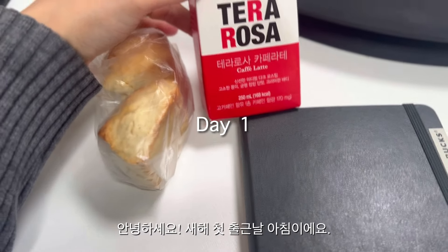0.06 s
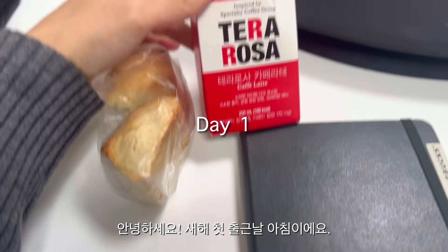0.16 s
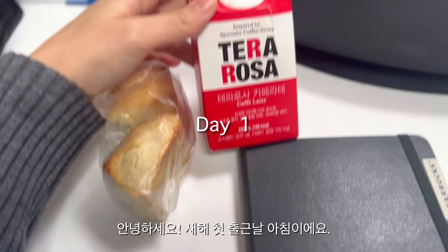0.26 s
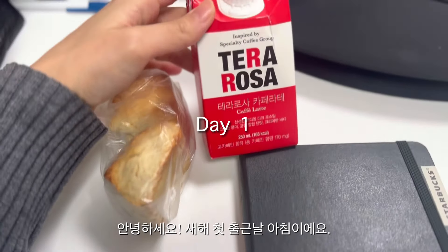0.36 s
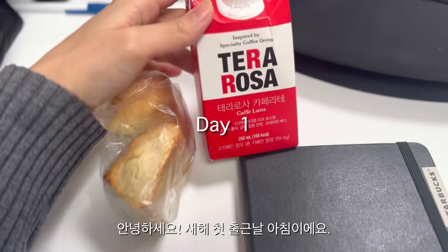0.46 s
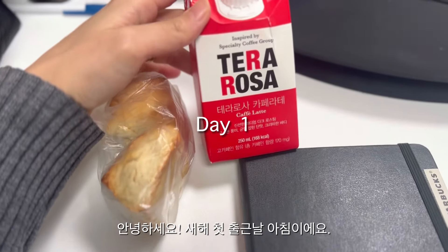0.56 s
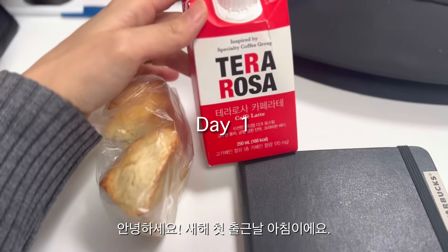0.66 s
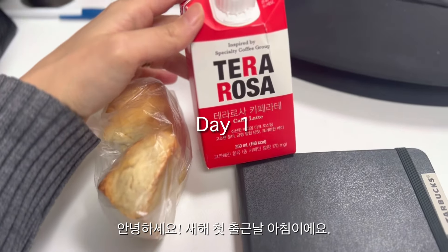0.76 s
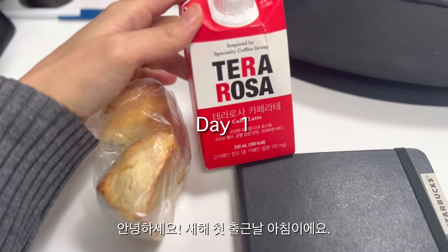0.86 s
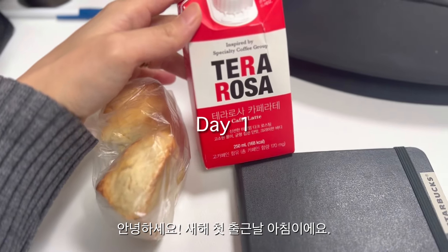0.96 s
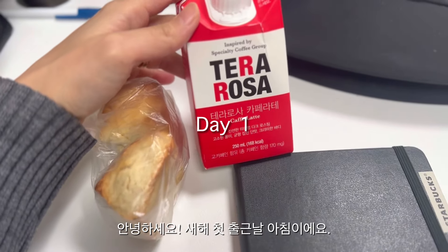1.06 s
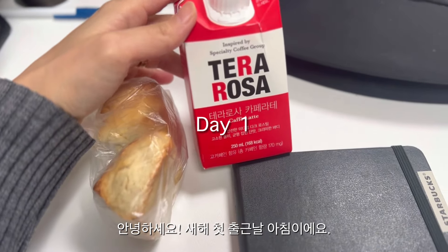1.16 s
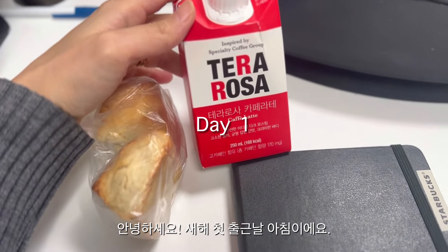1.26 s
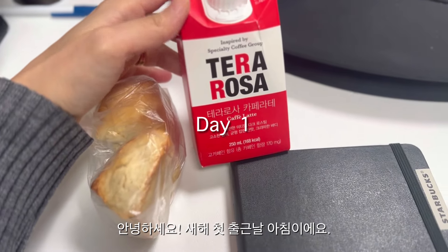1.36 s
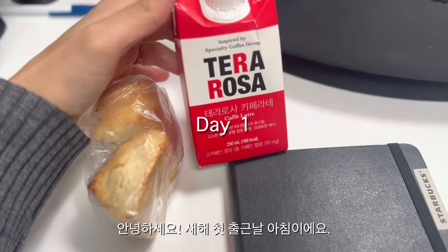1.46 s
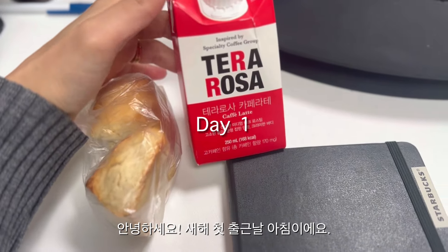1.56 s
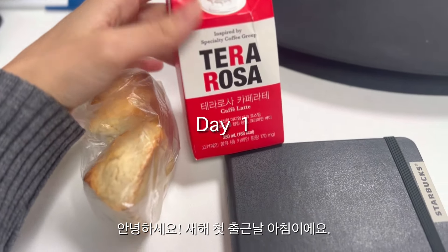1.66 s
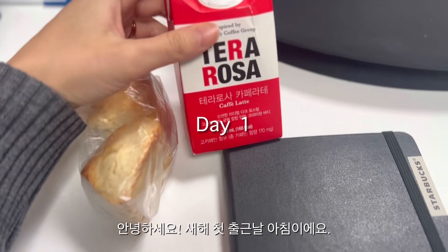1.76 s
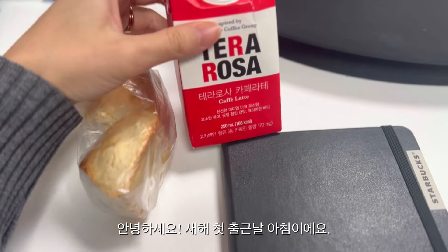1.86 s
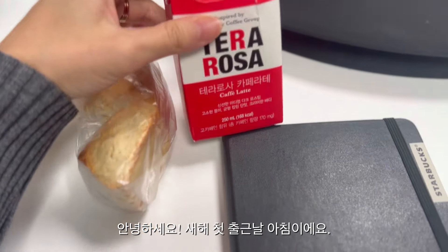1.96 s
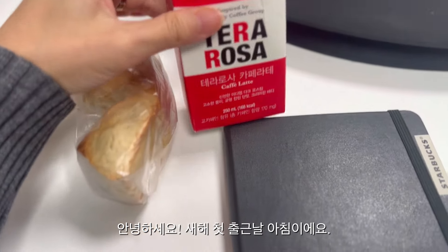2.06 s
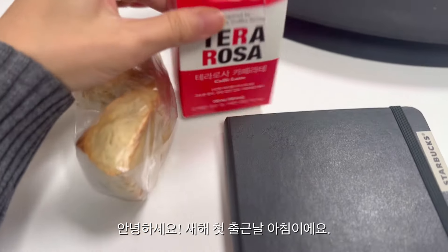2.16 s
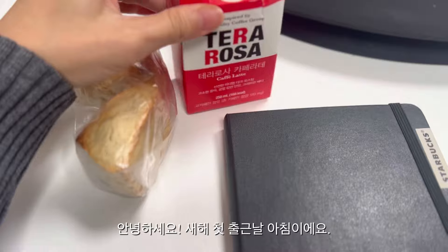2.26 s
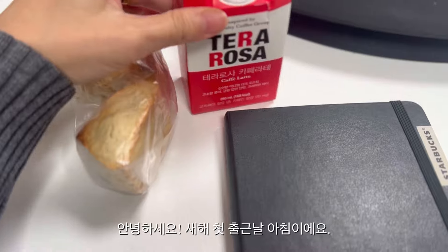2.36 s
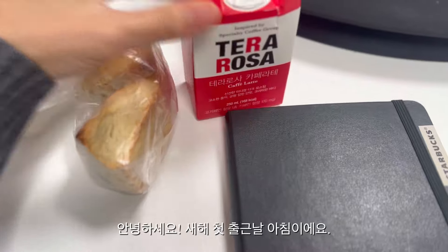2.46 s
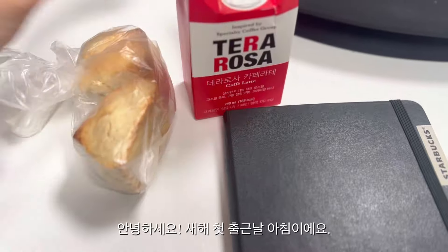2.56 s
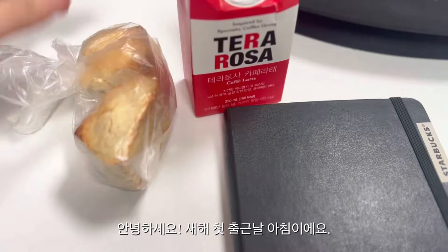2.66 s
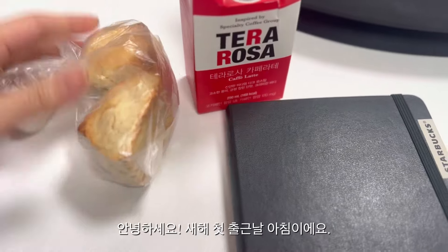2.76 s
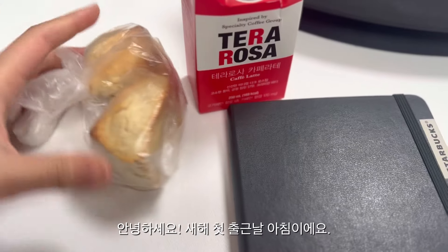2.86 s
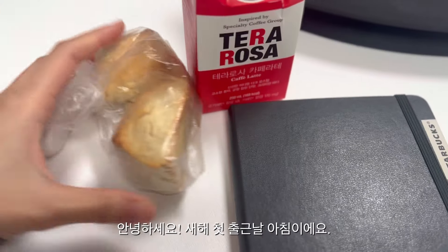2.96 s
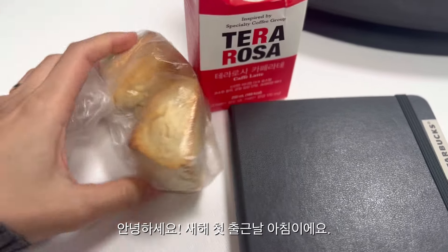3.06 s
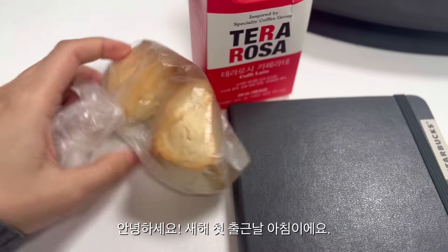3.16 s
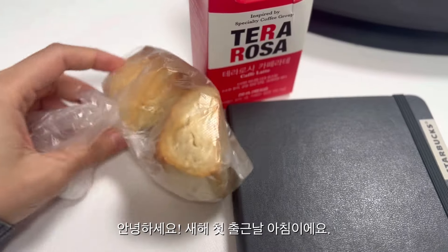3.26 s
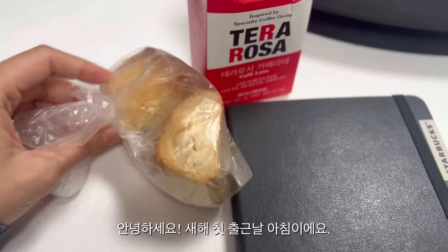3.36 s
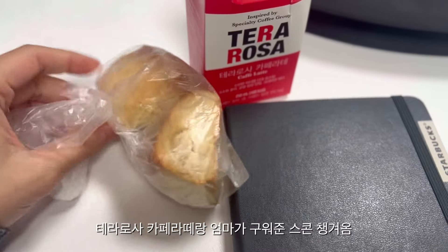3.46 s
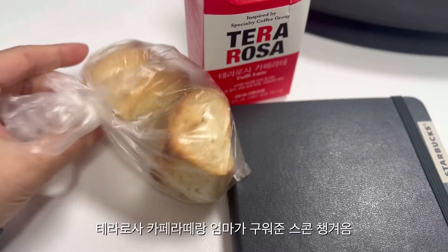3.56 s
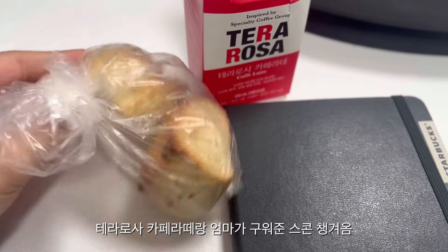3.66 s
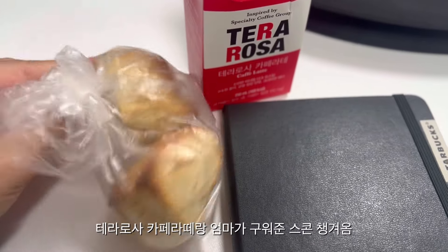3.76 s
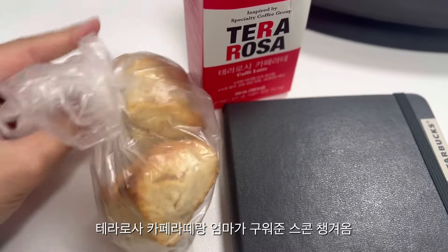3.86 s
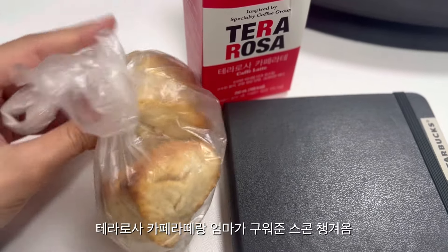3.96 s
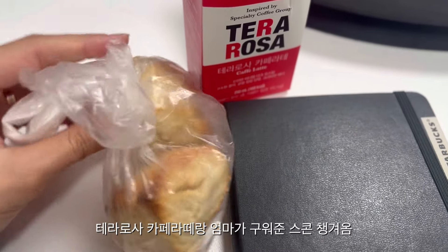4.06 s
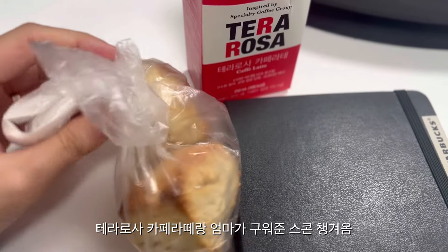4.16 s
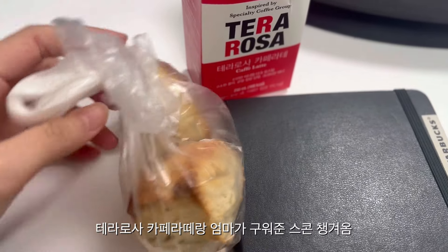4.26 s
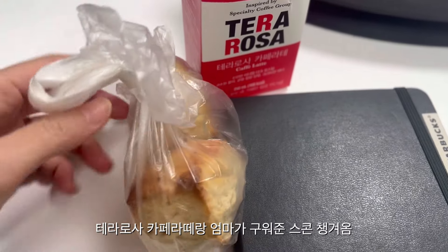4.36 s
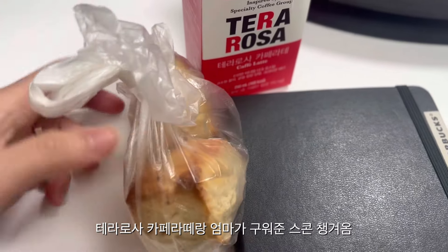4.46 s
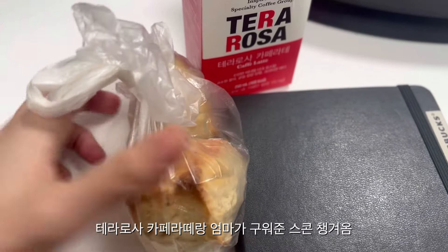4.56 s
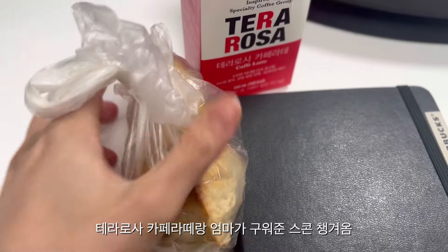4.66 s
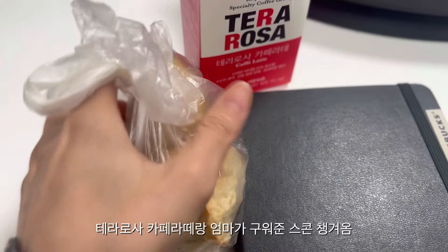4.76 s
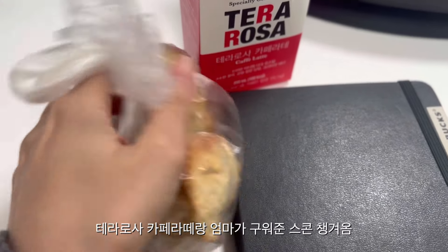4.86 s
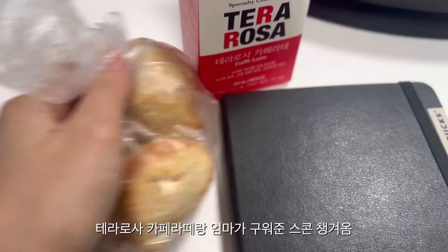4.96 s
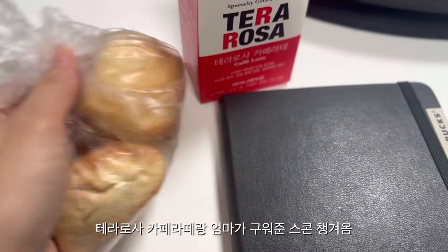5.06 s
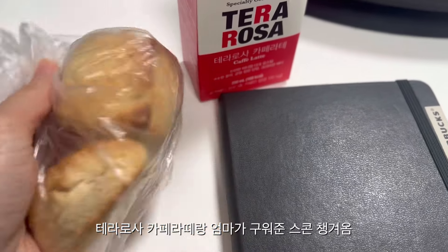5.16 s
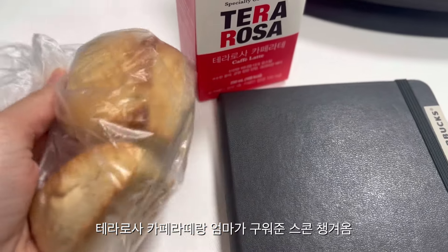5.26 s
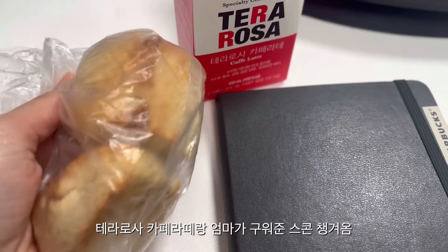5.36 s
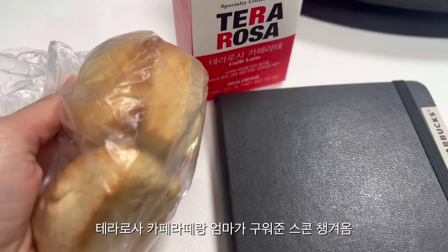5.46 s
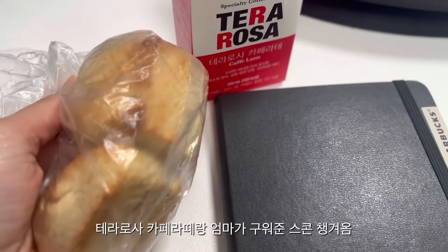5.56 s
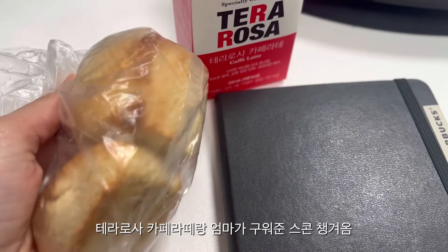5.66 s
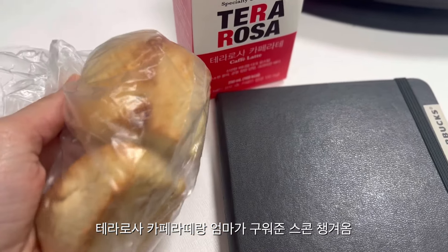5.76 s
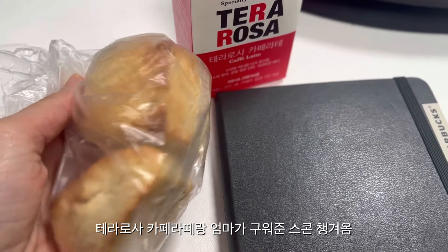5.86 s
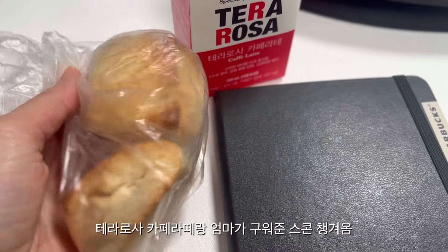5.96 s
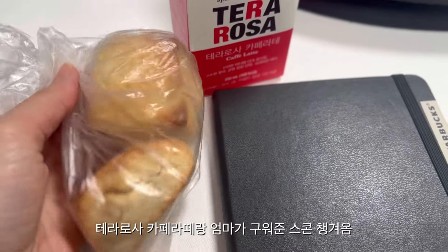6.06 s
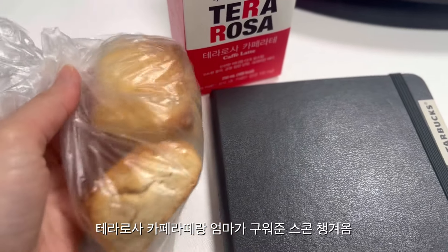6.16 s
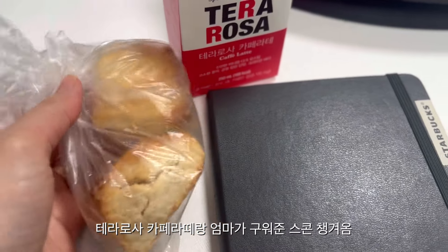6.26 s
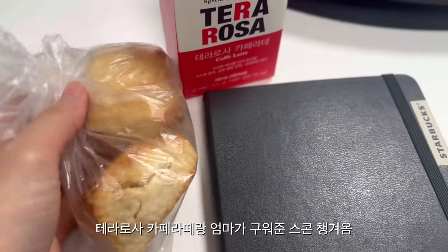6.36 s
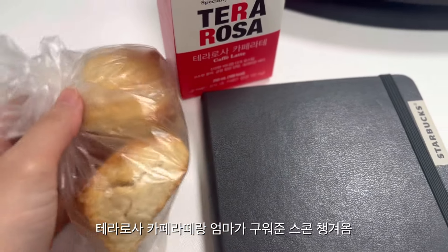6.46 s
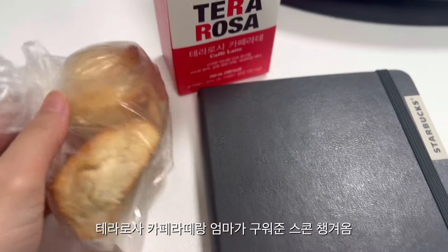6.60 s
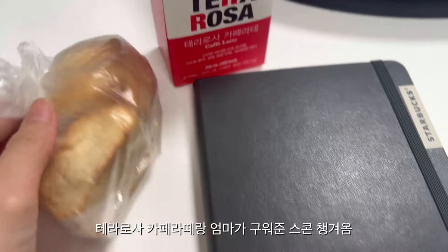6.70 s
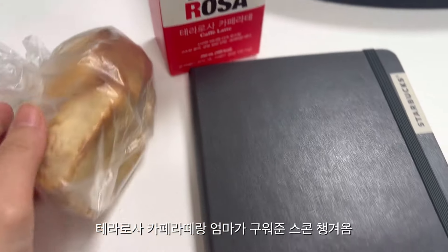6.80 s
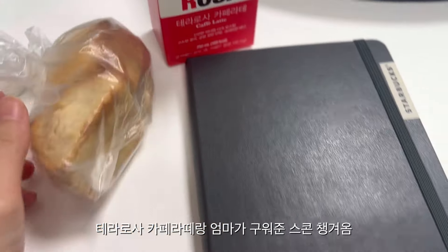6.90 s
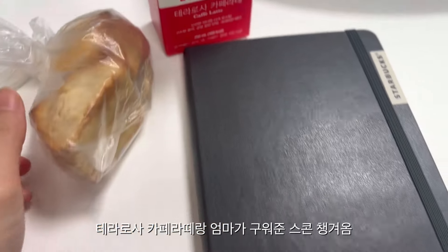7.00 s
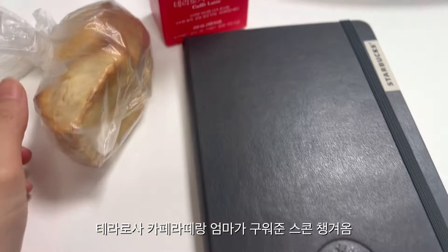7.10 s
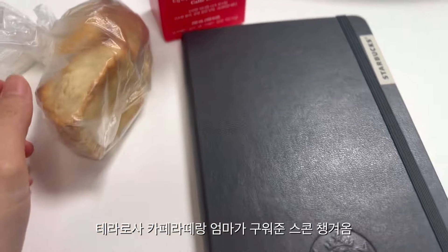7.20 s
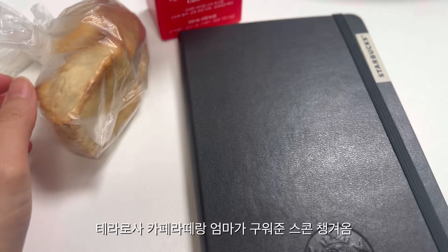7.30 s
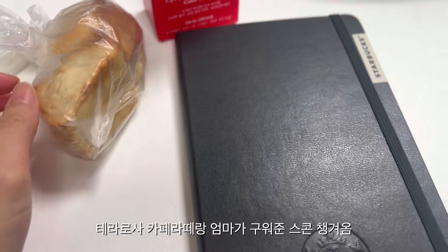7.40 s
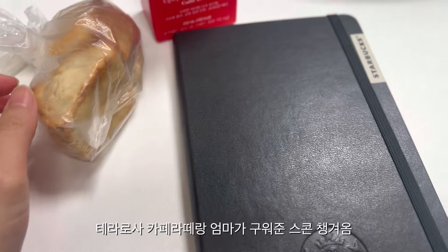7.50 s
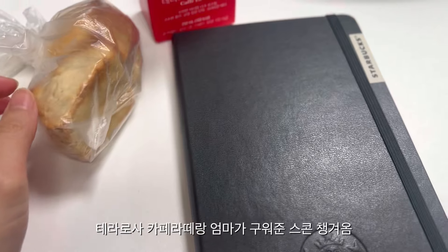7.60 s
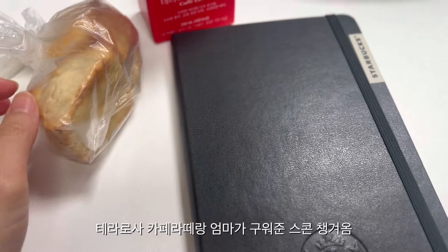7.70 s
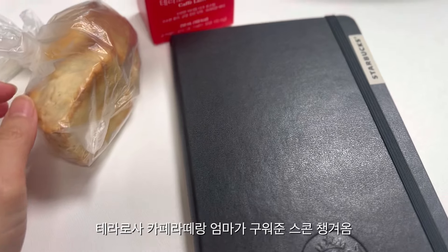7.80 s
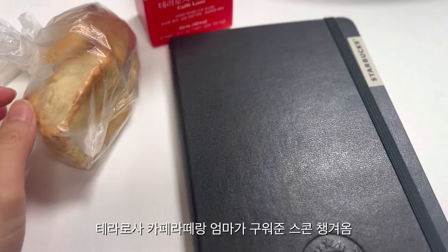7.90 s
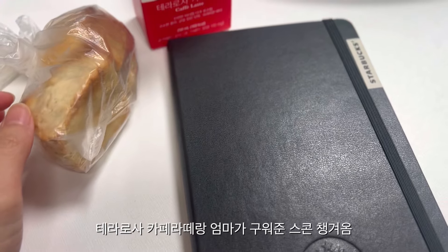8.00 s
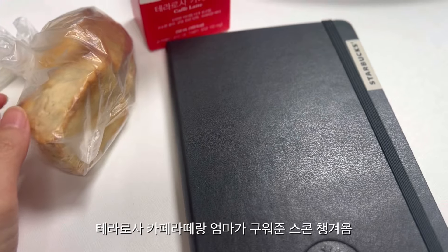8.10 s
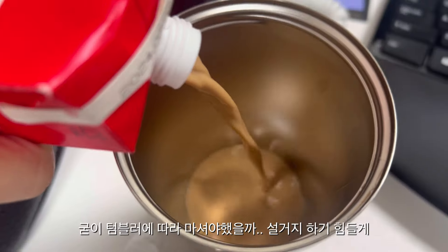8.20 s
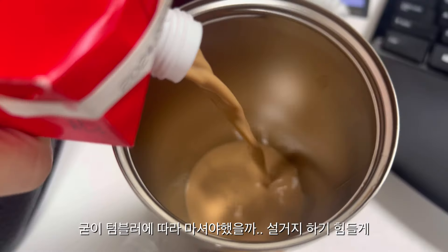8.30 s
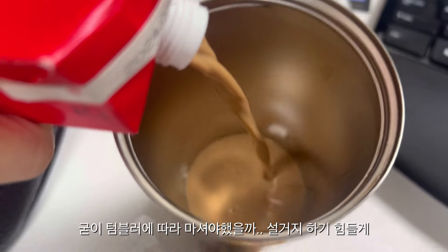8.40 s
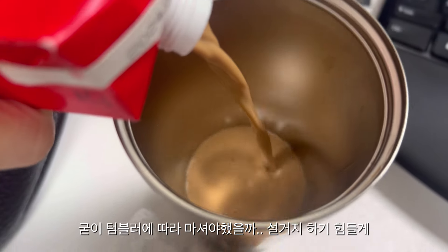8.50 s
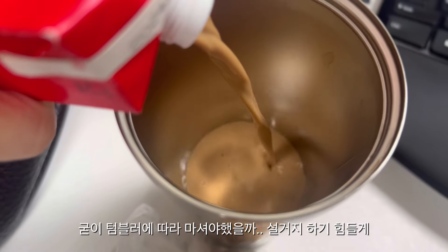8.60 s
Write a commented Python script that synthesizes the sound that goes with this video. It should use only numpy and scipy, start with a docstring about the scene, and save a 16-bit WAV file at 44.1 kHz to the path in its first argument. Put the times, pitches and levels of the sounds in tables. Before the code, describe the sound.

Close stereo pickup at an office desk: steady low air noise, sparse tiny plastic ticks, a short hollow carton scrape and a dull set-down. Then crisp crackling of a thin bag being gripped and turned, densest at first, later looser, with sharp single pops and one tiny squeak. It calms to a few ticks before a faint, hollow patter of liquid into a steel tumbler.

```python
"""Ventilation hums in an office while an arm moves over the desk and fingers lightly graze a bag of scones.
A hand shifts a drink carton and sets it down, then grips and turns the thin plastic bag.
The film crinkles: swarms of tiny noise bursts for buckling creases, with single sharper snaps and one squeak.
At the end coffee is poured quietly into a steel tumbler: a patter of bursts through air resonances.
Two closely spaced microphones hear it all, alike or apart by frequency."""
import sys
import numpy as np
from scipy import signal
from scipy.fft import rfft, irfft, next_fast_len
from scipy.io import wavfile
from scipy.ndimage import uniform_filter1d

SR = 44100
rng = np.random.default_rng(int(sys.argv[2]) if len(sys.argv) > 2 else 0)


def dump_mix(stems):
    """Bounce the given channels to the path in sys.argv[1] as a 16-bit WAV at rate SR."""
    frames = np.atleast_2d(stems).T  # one column per channel
    limited = np.clip(frames, -1, 1)  # hard clip at full scale
    pcm = np.round(limited * 32767).astype(np.int16)
    wavfile.write(sys.argv[1], SR, pcm)


N = 381024


def amp(db):
    """Decibels to gain."""
    return 10 ** (np.asarray(db) / 20)


def unit(x):
    """Scale to rms 1."""
    return x / np.sqrt(np.mean(x ** 2) + 1e-20)


def noise(length):
    """White noise in two independent rows."""
    return rng.standard_normal((2, length))


def along(points, hz):
    """Read (Hz, value) points on a log frequency axis."""
    f, v = np.transpose(points)
    return np.interp(np.log(hz + 1), np.log(f + 1), v)


def wobble(rate):
    """A random curve of straight lines between knots, with rate knots a second."""
    knots = rng.standard_normal(4096)
    return np.interp(np.arange(N) * rate / SR, np.arange(len(knots)), knots)


def filtered(x, response):
    """Multiply the spectrum of x by a response of frequency."""
    size = next_fast_len(x.shape[-1] + SR // 10, True)
    spectrum = rfft(x, size) * response(np.fft.rfftfreq(size, 1 / SR))
    return irfft(spectrum, size)[..., :x.shape[-1]]


def coloured(x, spectrum):
    """Filter x by (Hz, dB) points, at rms 1."""
    return unit(filtered(x, lambda hz: amp(along(spectrum, hz))))


def resonant(x, peaks):
    """Pass x through parallel (Hz, width Hz, dB) resonances of alternating sign, at rms 1."""
    def response(hz):
        total = 0
        for k, (centre, width, db) in enumerate(peaks):
            damping = 1j * hz * width
            total = total + (-1) ** k * amp(db) * damping / (centre ** 2 - hz ** 2 + damping)
        return total
    return unit(filtered(x, response))


def add(track, s, sound):
    """Mix a sound into the track at time s."""
    part = track[..., round(s * SR):][..., :sound.shape[-1]]
    part += sound[..., :part.shape[-1]]


def strokes(rows, attack_s, t60):
    """Gain of (start, length, dB) movements: each builds up, holds and dies away; their powers add."""
    t, power = np.arange(N) / SR, np.zeros(N)
    for start, length, db in rows:
        rise = np.clip((t - start) / attack_s, 0, 1)
        fall_db = -60 * np.clip((t - start - length) / t60, 0, 2)
        power += (rise * amp(db + fall_db)) ** 2
    return np.sqrt(power)


def crackle(rate, spread_db, t60):
    """A swarm of tiny bursts of uneven size, each dying within milliseconds; the mean level is evened out."""
    struck = rng.random(N) < rate / SR
    sizes = amp(spread_db * np.minimum(rng.standard_normal(N), 2)) * struck
    power = sizes ** 2 / (np.abs(uniform_filter1d(sizes ** 2, size=2200)) + 1e-6)
    power = signal.lfilter([1], [1, -amp(-60 / (t60 * SR)) ** 2], power)
    return unit(noise(N) * np.sqrt(power))


def reshaped(x, patchy_db):
    """Patches of time and frequency swell and fade at random, as when resonances come and go."""
    z = signal.stft(x, nperseg=512)[2]
    field = rng.standard_normal(z.shape[1:])
    field = uniform_filter1d(field, size=9, axis=0)
    field = uniform_filter1d(field, size=6, axis=1)
    return signal.istft(z * amp(patchy_db * unit(field)), nperseg=512)[1][:, :N]


def ventilation():
    """Low air noise, faint hiss and a mains hum slightly unsteady in level and phase."""
    # air noise spectrum: f/Hz, relative level/dB
    air_spectrum = [(22, -37), (40, -7.5), (62, 1), (95, -12.5), (130, -9.5), (160, -17.5), (220, -14),
                    (370, -16), (440, -22.5), (530, -19), (720, -32), (1050, -30.5), (1800, -32.5),
                    (3000, -49.5), (6000, -56.5), (16000, -70.5)]
    # hum tones: f/Hz, level/dB
    hum_tones = [(59.6, -56), (120, -63)]
    t = np.arange(N) / SR
    air = amp(-53.5) * coloured(noise(N), air_spectrum)
    hiss = amp(-86.5) * coloured(noise(N), [(3000, -2), (8000, -13.5), (13000, -2.5), (16000, -7.5)])
    hum = np.zeros(N)
    for hz, db in hum_tones:
        tone = unit(np.sin(2 * np.pi * hz * t + 0.21 * wobble(4)))
        hum += amp(db + 2.0 * wobble(5)) * tone
    return air + hiss + hum * np.array([[1], [0]])  # hum is shared by both ports


def sliding():
    """The hollow carton judders over the desk, a knitted sleeve brushes along and the desk top rumbles."""
    # the arm shifts over the desk: start t/s, length t/s, desk rumble level/dB, sleeve brush level/dB
    arm_moves = [(0, 2.4, -57, -79), (.43, 0.098, -50, -60.5), (1.74, 0.13, -48.5, -61.5),
                 (2.9, 0.9, -55, -78), (4.85, 0.22, -50, -80)]
    # the carton is pushed along: start t/s, length t/s, level/dB
    pushes = [(1.755, 0.046, -42), (1.93, 0.047, -53), (2.09, 0.038, -51.5)]
    # carton scrape spectrum: f/Hz, relative level/dB
    scrape = [(88, -67), (150, -21.5), (227, 0), (278, -11), (319, 2), (361, -11), (496, -7.5),
              (813, -25.5), (4000, -41), (5200, -67), (8800, -120)]
    # sleeve cloth spectrum: f/Hz, relative level/dB
    cloth = [(400, -1), (1100, 15), (2200, 2), (4500, -7.5), (8000, -25), (13000, -26.5), (16000, -20.5)]
    arm_attack_s, arm_t60_s = .04, 0.76
    push_attack_s, push_t60_s = 0.023, .35
    start, length, rumble_db, sleeve_db = np.transpose(arm_moves)
    brush = strokes(zip(start, length, sleeve_db), arm_attack_s, arm_t60_s)
    drag = strokes(zip(start, length, rumble_db), arm_attack_s, arm_t60_s)
    judder = coloured(crackle(rate=970, spread_db=2.0, t60=0.015), scrape)
    carton = strokes(pushes, push_attack_s, push_t60_s) * judder
    sleeve = brush * amp(1.1 * wobble(30)) * coloured(noise(N), cloth)
    rumble = drag * coloured(noise(N), [(40, -22), (75, 1), (105, 0.0), (170, -8.0), (260, -6),
                                        (450, -17.0), (800, -36), (3000, -65.5)])
    return carton + sleeve + rumble


def grazing(ticks_db=-2, rub_db=-5):
    """A light touch only flips a crease here and there, over a faint rub."""
    # light touches on the bag: start t/s, length t/s, level/dB
    grazes = [(0, 0.72, -82.5), (1.08, 0.53, -79), (1.6, 0.17, -66), (1.73, 0.094, -64.5), (1.9, 0.17, -67),
              (2.196, .035, -49.5), (2.35, .33, -74.5), (7.1, 0.16, -75), (7.44, 0.14, -70),
              (7.65, .08, -80), (7.88, .12, -78)]
    graze_attack_s, graze_t60_s = 0.012, 0.19
    ticks = crackle(rate=45, spread_db=4.5, t60=0.0084)
    rub = crackle(rate=2700, spread_db=1, t60=.006)
    film = reshaped(amp(ticks_db) * ticks + amp(rub_db) * rub, patchy_db=3.0)
    touch = strokes(grazes, graze_attack_s, graze_t60_s)
    return touch * coloured(film, [(400, -11.0), (1900, 6.5), (3000, 1.5), (7500, -2.0),
                                   (10000, -2.5), (12500, 1), (15700, -5)])


def snaps(t60=0.0033, rise=0.00073, after_t60=0.037, after_db=-22):
    """A crease cracks and the film around it flutters briefly; a lower panel rings, strongly or barely."""
    # single creases snapping: t/s, relative level/dB, relative level of the panel ring/dB
    snap_list = [(0.3665, -55, -12), (0.4194, -42.5, -30), (0.5382, -54, 5), (0.6454, -52, -10),
                 (0.7218, -49.5, -19), (0.904, -50.5, -15), (1.0956, -49, -1), (1.1586, -47, -23),
                 (1.2186, -42.5, -20), (1.3109, -53, -21), (1.38, -39, -27), (1.445, -46, -14),
                 (1.5415, -40, -7), (1.8252, -41.5, -11), (1.8507, -34, -12), (1.971, -45, -24),
                 (2.0012, -41, -6), (2.0203, -40, -21), (2.1974, -32.5, -5), (2.222, -40, -9),
                 (2.2604, -34.5, -24), (2.4119, -42, -12), (2.4713, -42, -7), (2.5032, -41, -20),
                 (2.5258, -41, -9), (2.649, -50, 4), (2.7362, -43, -20), (2.816, -28, -16),
                 (2.9946, -28, -17), (3.048, -24, -23), (3.3782, -18.5, -14.5), (3.656, -19, -22),
                 (3.913, -28.5, -24), (4.5282, -41, -26), (4.5847, -35.5, -8), (4.6782, -32, -16),
                 (4.722, -36, -23), (4.77, -25.5, -22), (4.815, -28.5, -13), (4.8414, -26, -20),
                 (5.0444, -25.5, -22.5), (5.1656, -18, -31), (5.171, -20, -25), (5.3878, -30, -6),
                 (5.4026, -30.5, -12), (5.45, -25.5, -29), (5.5159, -28, -27), (5.5365, -31.5, -25),
                 (5.662, -29.5, -27), (5.689, -25, -11), (5.8304, -33, -20), (5.973, -34, -22),
                 (6.136, -28.5, -18), (6.861, -29, -20), (6.9452, -29.5, -28), (7.001, -35.5, -28),
                 (7.0153, -40, -22), (7.0274, -39, -26), (7.0392, -31, -37), (7.0662, -34.5, -37),
                 (7.1313, -44.5, 1.5), (7.2273, -37.5, -10), (7.4126, -51, 4), (7.454, -44, -4),
                 (7.5078, -40.5, -24), (7.5426, -36, -14), (7.6806, -42, -18), (7.879, -49.5, -13),
                 (7.9767, -49.5, -9)]
    # crack spectrum: f/Hz, relative level/dB
    crack_spectrum = [(300, -23.5), (1200, 0), (2500, -10.5), (4500, -3), (7000, -2.5), (10000, -1),
                      (12500, 4), (15700, 0)]
    out, t = np.zeros((2, N)), np.arange(SR // 20) / SR
    swell = 1 - np.exp(-(t / rise) ** 4)
    fade = amp(-60 * t / t60) + amp(after_db - 60 * t / after_t60)
    for s, db, panel_db in snap_list:
        burst = noise(len(t)) * swell * fade
        panel_hz = 2700 * np.exp(.15 * rng.standard_normal())
        panel = amp(panel_db - 3.5) * resonant(burst, [(panel_hz, 800, 0)])
        add(out, s, amp(db - 21.0) * (coloured(burst, crack_spectrum) + panel))
    return reshaped(out, patchy_db=2)


def bumps(contact_time=0.0029):
    """The carton and the scones land softly: decaying desk modes ring under a dull burst of contact noise."""
    # soft blows on the desk: t/s, relative level/dB
    blows = [(2.2, -21), (2.261, -31.5), (2.291, -32.5), (3.844, -39), (4.308, -32), (5.029, -41),
             (5.686, -47), (6.19, -40), (6.236, -32)]
    # modes of desk and carton: f/Hz, mean relative level/dB, t60/s
    modes = [(77.1, -0.5, 0.11), (129.3, 3, 0.16), (175, -2, 0.039), (230, 1, 0.054), (302, -12, 0.05),
             (398, -9.5, 0.08), (575, -12.5, .05), (1277, -19, 0.11)]
    out, t = np.zeros((2, N)), np.arange(SR // 3) / SR
    soft_start = 1 - np.exp(-t / contact_time)
    thud_spectrum = [(60, -2.5), (300, 0.5), (750, -16.0), (1300, -15.5), (3500, -31.5), (9000, -49)]
    for s, db in blows:
        ring = np.zeros(len(t))
        for k, (hz, level, t60) in enumerate(modes):
            fade = amp(level + rng.normal(0, 1) - 60 * t / t60)
            ring += (-1) ** k * fade * np.sin(2 * np.pi * hz * t)
        contact = coloured(noise(len(t)) * amp(-60 * t / 0.086), thud_spectrum)
        shared_ring = ring * soft_start * np.array([[1], [0]])
        add(out, s, amp(db - 6.5) * shared_ring + amp(db - 29.5) * contact)
    return out


def creases(rate, spread_db, t60, ring_db, ring_t60):
    """Loose creases buckle at random; each gives a noisy crack and a brief ring at its own pitch."""
    t = np.arange(SR // 100) / SR
    when, size, pitch, life = rng.random((int(rate * N / SR), 4)).T[:, :, None]
    hz = 700 + 15000 * pitch ** 2
    age = t / (.5 + life)  # some die sooner than others
    crack = rng.standard_normal((2, len(when), len(t))) * amp(-60 * age / t60)
    # low pitches are more common, so each of them is weaker
    ring = amp(ring_db) * np.sqrt(pitch) * np.sin(2 * np.pi * hz * t) * amp(-60 * age / ring_t60)
    gain = amp(spread_db * np.minimum(-np.log(1 - size), 3))
    grains = gain * (crack + ring) * (1 - np.exp(-t / .0003))
    places = ((when * N).astype(int) + np.arange(len(t))).ravel()
    out = np.array([np.bincount(places, view.ravel(), 2 * N)[:N] for view in grains])
    local_power = np.abs(uniform_filter1d(np.mean(out ** 2, axis=0), size=3000))
    return out / np.sqrt(local_power + 1e-6)


def crinkle():
    """Film rubbing on film gives a fine swarm, loose creases a coarser crackle; wide panels add body."""
    # the fingers squeeze or turn the bag: start t/s, length t/s, level/dB
    squeezes = [(2.732, 0.073, -36.5), (2.85, 0.073, -44.5), (2.97, 0.14, -37.5), (3.1, 0.12, -34.5),
                (3.22, 0.19, -38), (3.42, 0.11, -35), (3.525, 0.17, -32.5), (3.715, 0.074, -32.5),
                (3.81, 0.077, -38), (3.925, 0.094, -36.5), (4.04, 0.21, -41), (4.275, .035, -36.5),
                (4.385, .035, -47.5), (4.57, 0.095, -57), (4.665, .045, -50.5), (4.75, .06, -48.5),
                (4.8, 0.21, -34.5), (5.025, 0.07, -31.5), (5.13, .12, -44), (5.27, .3, -48),
                (5.58, 0.2, -53.5), (5.765, 0.16, -46), (5.95, 0.14, -44.5), (6.105, .17, -39.5),
                (6.29, 0.096, -45), (6.425, 0.17, -40.5), (6.63, 0.16, -40.5), (6.92, 0.17, -64)]
    # film spectrum: f/Hz, relative level/dB
    film_spectrum = [(600, -43), (1500, -3), (2400, -6.5), (3400, -1), (5500, -2), (8500, 0.5),
                     (10000, -5.5), (11700, 7), (13500, 2.5), (15700, 2.5)]
    # spectrum of the wide panels: f/Hz, relative level/dB
    panel_spectrum = [(70, -11), (130, 7.5), (200, -0.5), (400, -0.5), (530, 4), (750, -2), (1300, 4.5),
                      (1800, -7), (2500, -7), (4500, -16.5)]
    # the film tightens, then settles when the fingers rest
    squeeze_attack_s, squeeze_t60_s = 0.034, 0.27
    # a squeeze lighter than this crackles, a firmer one rubs smoothly
    loose_below_db, loose_range_db = -43.5, 4.5
    grip = strokes(squeezes, squeeze_attack_s, squeeze_t60_s)
    grip_db = 20 * np.log10(grip + 1e-6)
    loose = 1 / (1 + np.exp((grip_db - loose_below_db) / loose_range_db))
    fine = crackle(rate=2800, spread_db=1.5, t60=.0033) * amp(0.76 * wobble(110))
    coarse = creases(rate=480, spread_db=3.5, t60=0.0072, ring_db=-2.5, ring_t60=0.0099)
    film = reshaped(np.sqrt(1 - loose) * fine + np.sqrt(loose) * coarse, patchy_db=1.45)
    bright = amp(1.26) * coloured(film, film_spectrum)
    body = amp(-12.0) * coloured(film, panel_spectrum)
    return grip * (bright + body)


def squeak(start=5.866, slip_hz=270, t60=0.065, level_db=-39):
    """A fingertip sticks and slips unevenly on taut film: irregular pulses excite its resonances."""
    # film stretched under a finger: f/Hz, width f/Hz, relative level/dB
    taut_film = [(1120, 180, 3.5), (1420, 120, -2), (1560, 130, 2), (2020, 240, 0.5), (2560, 160, 1)]
    out, t = np.zeros((2, N)), np.arange(SR // 10) / SR
    cycles = np.cumsum(slip_hz * (1 + .35 * wobble(300)[:len(t)])) / SR
    pulses = np.diff(np.floor(cycles), prepend=0)  # one pulse a cycle
    slips = pulses * (1 + 0.17 * noise(len(t)))
    swell = (1 - np.exp(-t / 0.0035)) * amp(-60 * np.maximum(t - .01, 0) / t60)
    add(out, start, amp(level_db) * swell * resonant(slips, taut_film))
    return out


def pour():
    """A stream patters into the tumbler's air resonances, splashes a little and gurgles low in the pool."""
    # air resonances of the tumbler: f/Hz, width f/Hz, relative level/dB
    tumbler = [(883, 41, 3.5), (1470, 170, -6), (1840, 260, -16), (2453, 180, -21), (3580, 720, -26.5)]
    # the pour begins as a trickle, then opens to a full stream
    trickle_s, stream_s, pour_rise_s = 8.16, 8.385, 0.035
    trickle_db, stream_db, gurgle_db = -72, -66, 13  # gurgle is relative to the flow
    stages = [(trickle_s, np.inf, trickle_db), (stream_s, np.inf, stream_db)]
    flow = strokes(stages, pour_rise_s, 1)
    drops = coloured(crackle(rate=1000, spread_db=3.0, t60=0.0054),
                     [(1000, -3.0), (3000, 0.5), (6000, -9.5), (15000, -22)])
    splash = coloured(reshaped(drops, patchy_db=10),
                      [(500, -19), (1100, -8.0), (1600, 4), (2400, -6.5), (3500, -12),
                       (6000, -13.5), (12000, -14)])
    gurgle = resonant(resonant(drops, [(131, 26, 1)]), [(129, 73, 0)])
    return flow * (amp(2.5) * resonant(drops, tumbler) + amp(-15) * splash + amp(gurgle_db) * gurgle)


def room(x):
    """The office answers with a short tail of decaying noise, lasting longest in the upper middle."""
    # reverberation: f/Hz, t60/s
    decay = [(150, 0.22), (2000, 0.47), (8000, 0.21), (16000, .1)]
    hz, t, z = signal.stft(noise(SR // 3), SR, nperseg=256)
    fade = amp(-60 * t / along(decay, hz)[:, None])
    tail = signal.istft(z * fade, SR, nperseg=256)[1]
    return signal.oaconvolve(x, tail / np.linalg.norm(tail[0]), axes=1)[:, :N]


def microphones(pair):
    """Row 0 is what both ports share, row 1 what sets them apart; level and phase differ with frequency."""
    # likeness of the two ports: f/Hz, likeness 0-1
    alike = [(110, .98), (250, .87), (900, .6), (1300, .84), (2100, .55), (3200, .62), (5200, .2),
             (6000, .3), (6500, .83), (8600, .68), (10000, .99), (11000, .87), (15500, .84)]
    # phase lead of the left port: f/Hz, lead/rad
    lead = [(60, 0), (350, .15), (780, 1.8), (1000, .6), (1600, 3.1), (2500, 6.6), (3100, 6.8), (3600, 8),
            (4300, 7.2), (5600, 4.6), (6800, 6.4), (8500, 4.9), (9700, 3.3), (10700, 2.8), (13400, 0),
            (16000, -2.7)]
    # left minus right: f/Hz, level/dB
    tilt = [(100, 1.5), (400, 0), (850, 4), (1600, 4.5), (2700, 1.5), (4700, 5.5), (7500, 2.5),
            (9500, -0.5)]

    def blend(hz):
        angle = np.arccos(np.clip(along(alike, hz), 0, 1)) / 2
        return np.array([np.cos(angle), np.sin(angle)])

    half = np.array([[.5], [-.5]])  # each port takes half the difference

    def port_response(hz):
        return amp(half * along(tilt, hz)) * np.exp(1j * half * along(lead, hz))

    shared, apart = filtered(pair, blend)
    return filtered(np.array([shared + apart, shared - apart]), port_response)


def scene():
    """Everything on the desk, its room answer and the ventilation."""
    desk = sliding() + grazing() + snaps() + bumps() + crinkle() + squeak() + pour()
    return microphones(desk + amp(-13) * room(desk) + ventilation())


def record(dry):
    """A very steep low-pass removes the top of the treble."""
    top_hz = 15850
    return filtered(dry, lambda hz: 1 / np.sqrt(1 + (hz / top_hz) ** 300))


dry = scene()
out = record(dry)
dump_mix(out)
```